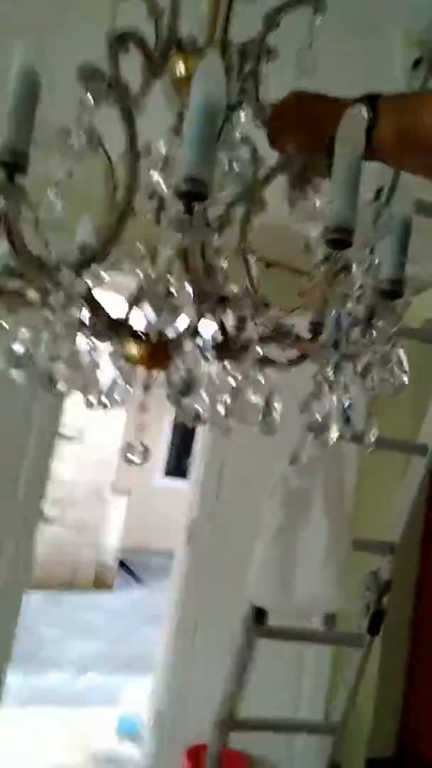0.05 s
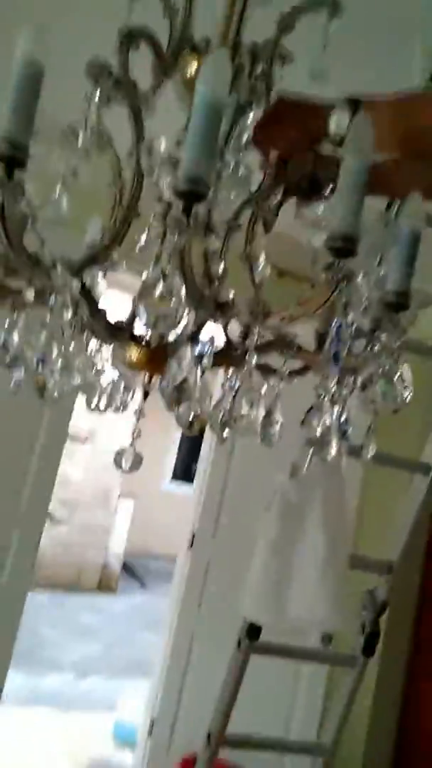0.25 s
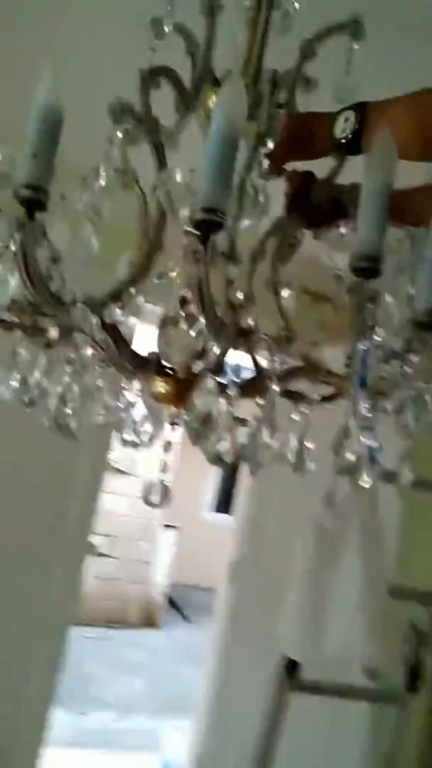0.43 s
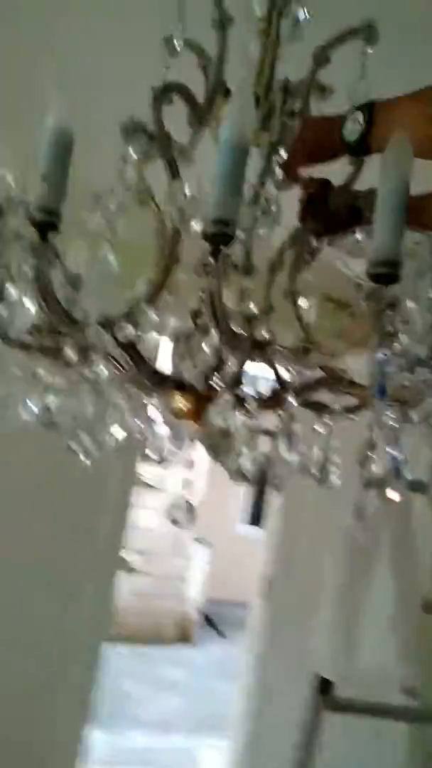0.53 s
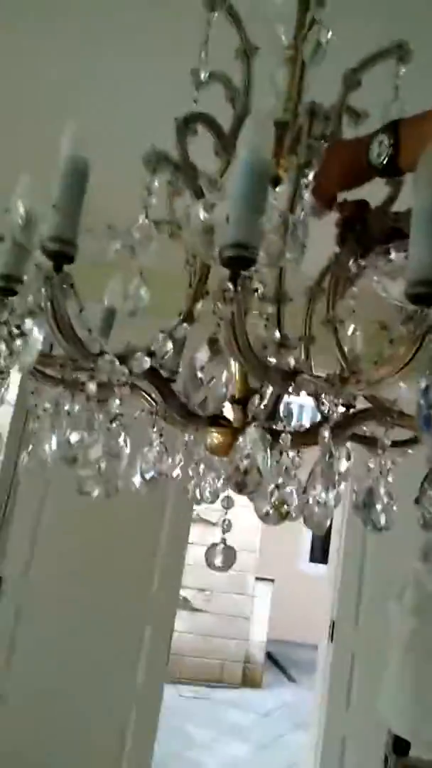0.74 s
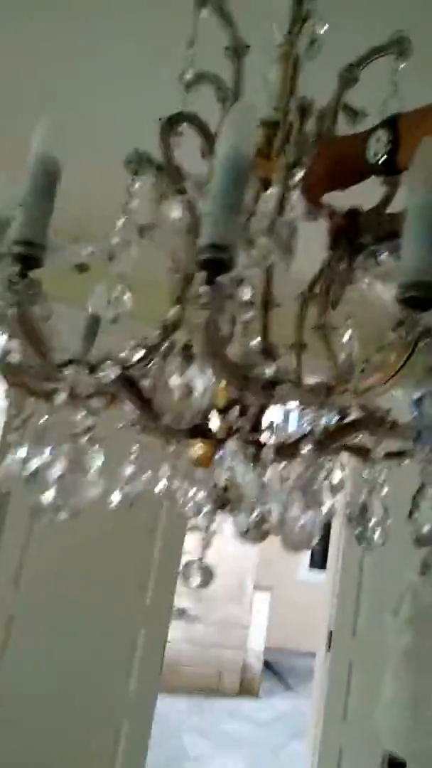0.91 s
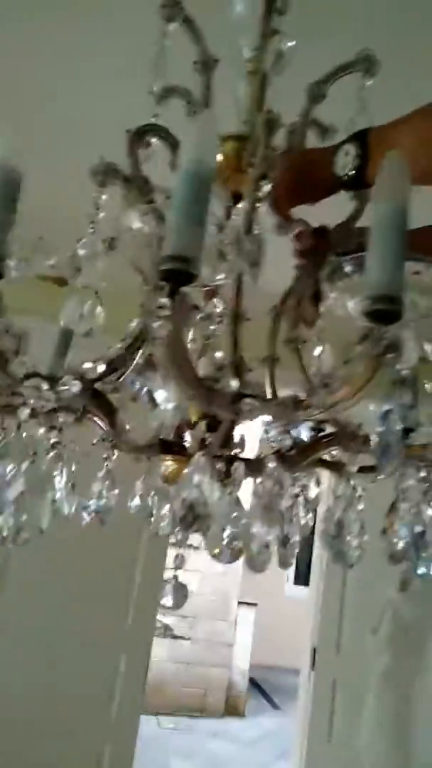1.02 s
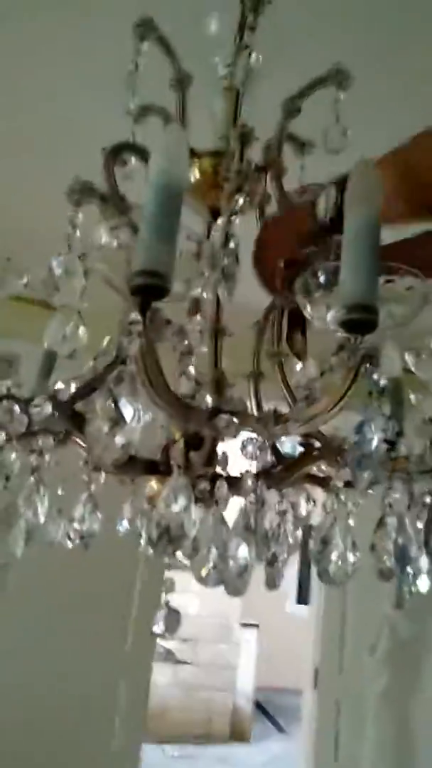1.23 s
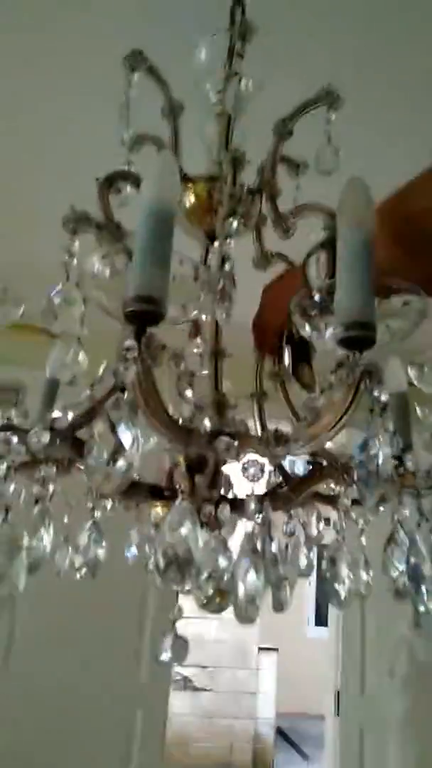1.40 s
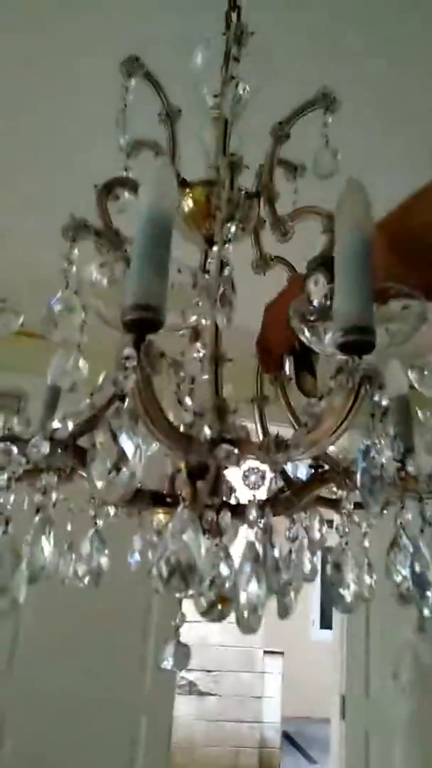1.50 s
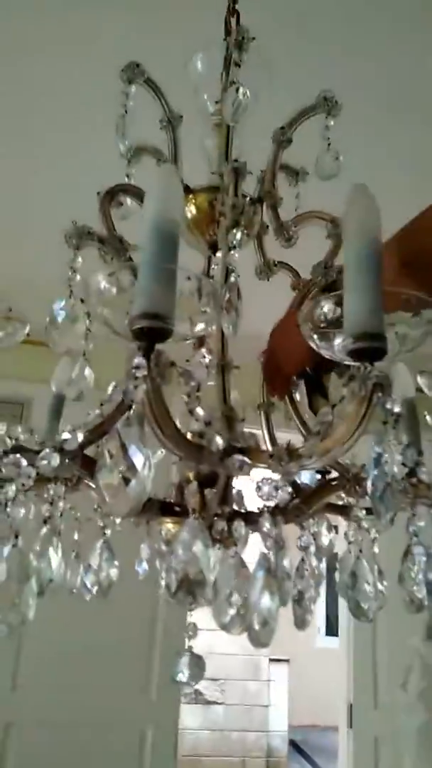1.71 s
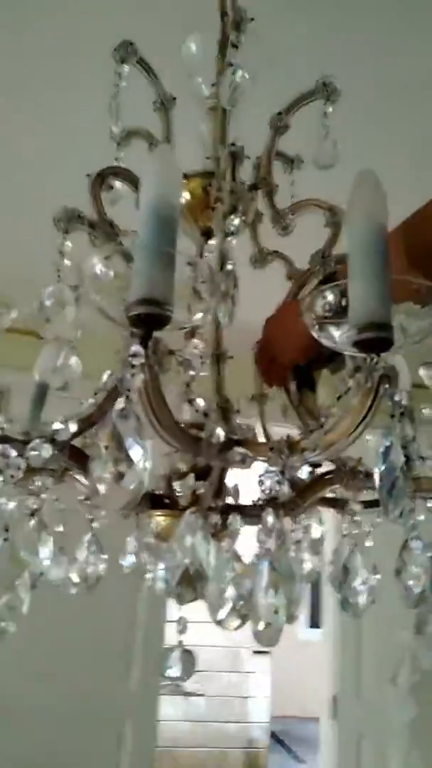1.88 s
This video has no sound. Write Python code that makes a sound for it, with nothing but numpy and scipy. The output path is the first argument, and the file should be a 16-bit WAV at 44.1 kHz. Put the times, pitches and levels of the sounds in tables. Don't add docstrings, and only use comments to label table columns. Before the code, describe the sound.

A hand-knocked chandelier jingles: sharp high glass clinks in a dense burst, then a few stray ones

```python
import sys
import numpy as np
from scipy import signal
from scipy.fft import rfft, irfft
from scipy.io import wavfile
from scipy.ndimage import uniform_filter1d, minimum_filter1d

SR = 44100
rng = np.random.default_rng(int(sys.argv[2]) if len(sys.argv) > 2 else 0)


def linear_from_db(decibels):
    return 10 ** (np.asarray(decibels, float) / 20)


def unload_audio(sound):
    columns = np.transpose(np.atleast_2d(sound))
    steps = np.round(np.clip(columns, -1, 1) * 32767)
    wavfile.write(sys.argv[1], SR, steps.astype(np.int16))


N = 85995
LEAD = 13230
ALIKE_UNDER_HZ = 715
SPREAD_DB = 3


def read(table, x, axis=1, log=False):
    rows = np.array(table, float)
    if log:
        return np.interp(np.log(x), np.log(rows[:, 0]), rows[:, axis])
    return np.interp(x, rows[:, 0], rows[:, axis])


def highpass(x, hz, order=3):
    return signal.sosfilt(signal.butter(order, hz, "high", fs=SR, output="sos"), x)


def onset(size, rise_s):
    return 1 - np.exp(-np.arange(size) / SR / rise_s)


def wander(step):
    return uniform_filter1d(np.repeat(rng.standard_normal(N // step + 1), step), step)[:N]


def ring(hz, db, t60, phase, size):
    pole = (2j * np.pi * hz - np.log(1000) / t60)[:, None, None] / SR
    fade = np.exp(pole * np.arange(0, size, 64)[:, None]) * np.exp(pole * np.arange(64))
    weight = linear_from_db(db)[..., None, :] * np.exp(1j * phase)
    return (weight @ fade.reshape(len(hz), size)).imag


def modes(shape, lo_hz, hi_hz, main_hz, main_db, t60, main_t60, count, size):
    f = lo_hz * (hi_hz / lo_hz) ** ((np.arange(count) + rng.random(count)) / count)
    db = read(shape, f, log=True) + 10 * np.log10(f / main_hz) + SPREAD_DB * rng.standard_normal(count)
    t60 = np.append(t60 * linear_from_db(2.5 * rng.standard_normal(count)), main_t60)
    f = np.append(f, main_hz)
    phase = 2 * np.pi * rng.random((2, count + 1))
    phase[1] = phase[0] + (phase[1] - np.pi) * np.clip(f / ALIKE_UNDER_HZ - .3, 0, 1)
    direct, echoed = np.append(db, main_db), np.append(db, main_db - 7)
    return ring(f, np.array([direct, echoed]), t60, phase, size)


# f/Hz, density level/dB per Hz
GLASS_COLOUR = [(1760, -72), (3000, -42), (3380, -44.5), (7650, -11), (8270, -11), (10900, -2), (13600, 0),
                (16300, -13.5)]


def glass_drop(main_hz):
    contact_s, burst_s = 0.00034, 0.0057
    glass = modes(GLASS_COLOUR, 4490, 16220, main_hz, main_db=7, t60=.006, main_t60=.012, count=90, size=640)
    glass = glass * onset(640, contact_s)
    taps = rng.random((9, 2))
    contacts = np.zeros(512)
    contacts[0] = 1
    when = np.clip(taps[:, 0] * burst_s * SR, 1, 500).astype(int)
    contacts[when] = (2 * taps[:, 1] - 1) * linear_from_db(-6.5 * taps[:, 0])
    glass = highpass(signal.fftconvolve(glass, contacts[None, None], axes=2), 1470)
    return glass / np.abs(glass).max()


# f/Hz, density level/dB per Hz
FRAME_COLOUR = [(400, -18.5), (920, 0), (1250, -8.5), (1700, 4.5), (2700, 6), (3500, -1.5), (4600, 4.5),
                (7500, -1)]


def frame_knock(db, frame_db, knock_hz):
    lo_hz = 333.8 * linear_from_db(-0.342 * max(db, -30))
    out = modes(FRAME_COLOUR, lo_hz, 7524, knock_hz, main_db=12, t60=.015, main_t60=.045, count=70, size=2048)
    return out * onset(2048, .003) * linear_from_db(frame_db + 2.5) / 4


def contact_tick():
    tick = np.pad(rng.standard_normal((2, 96)) * np.hanning(96), ((0, 0), (0, 160)))
    return linear_from_db(-15) * highpass(tick, 3470)


def clink(db, hz, frame_db, knock_hz):
    out = frame_knock(db, frame_db, knock_hz)
    glass = glass_drop(hz)
    out[..., :glass.shape[2]] += glass
    out[..., :256] += contact_tick()
    return out


# t/s, level/dB
RATTLE_LEVEL = [(0, -91.5), (.23, -68), (.26, -23), (.45, -11.5), (.6, -32), (.75, -38), (.9, -43),
                (1.0, -80)]


def rattle():
    luck = rng.random((60, 4))
    s = .2 + .8 * luck[:, 0]
    db = read(RATTLE_LEVEL, s) - 8 * luck[:, 1]
    return np.c_[s, db, 7000 + 8000 * luck[:, 2], -16 + 0 * s, 800 + 4000 * luck[:, 3]]


# t/s, peak level/dB, loudest glass mode f/Hz, frame re glass level/dB, loudest frame mode f/Hz
KNOCKS = [(0.1534, -18, 11060, -16.5, 2696), (0.2393, -13, 15400, -22.5, 3090),
          (0.2408, -3.5, 9860, -27, 5240), (0.252, -5, 12800, -26, 2006),
          (0.2654, -14.5, 13500, -14.5, 1920), (0.2784, -34, 8700, -61, 5340),
          (0.3006, -12.5, 14200, -18, 4650), (0.3201, -8, 13600, -18, 2590),
          (0.3705, -3.5, 13400, -14.5, 5280), (0.3824, -4.5, 9510, -16, 2160),
          (0.4388, -10.5, 12310, -12, 2836), (0.461, 1, 14660, -20.5, 2793), (0.4624, -4, 10500, -17, 1643),
          (0.4774, 0.5, 13990, -18, 2347), (0.5094, -3.5, 10800, -39, 2700),
          (0.5805, -6.5, 10750, -21.5, 2120), (0.8164, -19.5, 10000, -8.5, 1982),
          (0.849, -9.5, 13220, -21, 5260), (0.8614, -14, 9950, -17.5, 2780), (1.23, -21, 11110, -39, 5500),
          (1.2366, -28, 10960, -51, 1700), (1.2444, -28, 12900, -64, 4710), (1.3912, -6, 12370, -25, 5760),
          (1.3935, -13, 13000, -50, 5310), (1.4354, -35, 12330, -63.5, 4120),
          (1.4584, -26.5, 11860, -69.5, 4070)]
EARLIER_KNOCKS = [
    (-.28, -8.5, 10940, -29, 2300),
    (-.25, -17.5, 12790, -24.5, 2900),
    (-.22, -18, 13670, -15.5, 4400),
    (-.19, -23, 14500, -9, 4800),
    (-.15, -19.5, 9420, -17, 1900),
]
# t/s, direct sound level/dB
FACING = [(.153, -7.5), (.24, 0.5), (.253, 2), (.266, -18), (.3, 3), (.32, -9), (.37, -9), (.383, -3.5),
          (.44, -7), (.4605, 2), (.478, -0.5), (.51, -10), (.58, -2), (.85, -4.5), (1.23, -5.5),
          (1.391, -0.5), (1.4, -2.5), (1.46, -4)]


def crystals():
    out = np.zeros((2, 2, LEAD + N + 2048))
    for s, db, hz, frame_db, knock_hz in [*EARLIER_KNOCKS, *KNOCKS, *rattle()]:
        i = LEAD + int(s * SR)
        level = linear_from_db(db + np.array([read(FACING, s), 0]))
        out[:, :, i:i + 2048] += clink(db, hz, frame_db, knock_hz) * level[:, None, None]
    return highpass(out[:, :, :LEAD + N], 350, order=4)


# f/Hz, level/dB, t60/s
BOWL_MODES = [(868.8, -7.5, 0.11), (965, -13.5, 0.2), (1524, -8.5, 0.33), (1662, -6, 0.47), (2052, 2, 0.52),
              (2315, -12, 0.64), (2527, -13.5, 0.5), (2863, -12.5, 0.14), (4340, -3, 0.81),
              (4830, -8, 0.64), (5263, -8.5, 0.93), (7280, -7.5, 0.12), (10550, 0, .2), (10750, -2, 0.42)]


def bowls():
    rows = np.array(BOWL_MODES)
    out = np.zeros((2, LEAD + N + 16384))
    for s, db, hz, frame_db, knock_hz in KNOCKS:
        luck = rng.standard_normal((4, len(rows)))
        if db + frame_db > -30:
            i = LEAD + int(s * SR)
            f = rows[:, 0] * (1 + .004 * luck[3])
            sing = ring(f, rows[:, 1] + SPREAD_DB * luck[0], rows[:, 2], 2 * luck[1:3], size=16384)
            out[:, i:i + 16384] += sing * linear_from_db(-44 + db) * onset(16384, 0.0013)
    return out[:, :LEAD + N]


# f/Hz, t60/s, level/dB
REVERB = [(404, 1.8, 0), (1080, 1.67, 0), (2500, 1.49, -1.5), (5257, 1.413, -0.5), (10000, 0.91, 1.5),
          (16700, 1.3, -9)]


def room(near, x):
    first_echo_s, build_s, early_db, early_t60_s = 0.0019, 0.015, 21, 0.046
    size = 2 * SR
    t = np.arange(size) / SR
    f = np.arange(size // 2 + 1) * SR / size + 1
    noise = rfft(rng.standard_normal((2, size)))
    alike = np.clip(1.3 - f / ALIKE_UNDER_HZ, 0, 1)
    noise[1] = alike * noise[0] + np.sqrt(1 - alike ** 2) * noise[1]
    tail = 0
    for hz in 200 * 2 ** np.arange(0, 6.6, .5):
        band = irfft(noise * np.clip(1 - 2 * np.abs(np.log2(f / hz)), 0, 1), size)
        tail = tail + band * linear_from_db(read(REVERB, hz, axis=2, log=True) - 60 * t / read(REVERB, hz, log=True))
    tail = tail * (1 + linear_from_db(early_db - 60 * t / early_t60_s))
    tail = tail * (1 - np.exp(-np.maximum(t - first_echo_s, 0) / build_s))
    side = np.array([[.5], [-.5]])
    tail = tail * linear_from_db(2.5 - 2.5 * side) / np.sqrt(SR / 14)
    return near * linear_from_db(6 * side) + signal.fftconvolve(x, tail, axes=1)[:, :x.shape[1]]


def scene():
    return room(*(crystals() + bowls()))[:, LEAD:]


# t/s, peak level/dB, f/Hz
FINGER_BUMPS = [
    (0.31, -65, 45.1),
    (0.34, -75, 108),
    (.41, -75, 153),
    (0.461, -54, 59.6),
    (0.744, -86, 108),
    (0.783, -58, 55),
    (1.231, -61, 56),
    (1.388, -65.5, 112.5),
    (1.61, -56, 113.6),
    (1.646, -48.5, 98.6),
]
# t/s, peak level/dB, f/Hz, half length/s
FRAME_CREAKS = [
    (.87, -53.5, 614, 0.01),
    (.97, -60, 496, 0.023),
    (1.05, -67, 196, 0.042),
    (1.13, -65.5, 344, 0.021),
    (1.255, -67.5, 688, 0.015),
    (1.27, -72, 489, 0.033),
    (1.395, -56.5, 1455, 0.0048),
    (1.93, -81.5, 615, 0.019),
]


def bumps_and_creaks():
    t = np.arange(N) / SR
    wobble = 2.5 * wander(400)
    out = np.zeros(N)
    for s, db, hz, half in [(*row, 0.011) for row in FINGER_BUMPS] + FRAME_CREAKS:
        phase = 2 * np.pi * hz * (t - s) + wobble * (hz > 180)
        out += linear_from_db(db) * np.exp(-((t - s) / half) ** 2) * np.sin(phase)
    return out


# f/Hz, density level/dB per Hz
FLOOR_COLOUR = [(15, -52), (25, -27), (55, -7.5), (98, -5), (160, -6), (350, -14.5), (700, -23),
                (2000, -24.5), (7000, -41), (9500, -59), (16000, -91.5)]
# t/s, level/dB
FLOOR_LEVEL = [(0, 4.5), (.25, 3), (.4, 11.5), (1.0, 0), (1.15, 2), (1.27, 3), (1.45, 4), (1.72, 1),
               (1.8, -4), (1.95, -3)]


def floor():
    t = np.arange(N) / SR
    f = np.arange(N // 2 + 1) * SR / N + 1
    mid, side = irfft(rfft(rng.standard_normal((2, N))) * linear_from_db(read(FLOOR_COLOUR, f, log=True)), N)
    out = (mid + linear_from_db(-7) * side * np.array([[1], [-1]])) / mid.std()
    return out * linear_from_db(-75 + 1.5 * wander(2000) + read(FLOOR_LEVEL, t))


# t/s, below the split level/dB, above the split level/dB
SUPPRESSOR_GAIN = [(0, 7.5, 6), (1.0, 1.5, -6), (1.07, -4, -3.5), (1.17, -19, -27.5), (1.225, -20.5, -55.5),
                   (1.229, -9.5, 2), (1.24, -12.5, 9), (1.3, -15.5, 0.5), (1.387, -13.5, -4.5),
                   (1.39, 6, 12.5), (1.398, -15.5, 4.5), (1.46, -20.5, 8), (1.54, -28, -12.5),
                   (1.65, -30, -14.5), (1.78, -29, -20.5), (1.95, -40.5, -18)]
# t/s, level/dB
LOW_BAND_GAIN = [(0, 5), (.1, -10), (.245, 1.5), (.36, 3.5), (1.95, -7)]


def suppressor(dry):
    t = np.arange(N) / SR

    def under(hz, order=5):
        return signal.sosfiltfilt(signal.butter(order, hz, fs=SR, output="sos"), dry)

    slow, low, high = under(1380), under(9600, order=4), under(14000)
    middle = linear_from_db(read(SUPPRESSOR_GAIN, t))
    lazy = uniform_filter1d(minimum_filter1d(middle, size=4096), size=1024)
    top_db = read(SUPPRESSOR_GAIN, t, axis=2)
    air_db = top_db + .5 * np.minimum(top_db - 16, 0) * (t > 1.39)
    x = slow * lazy * linear_from_db(read(LOW_BAND_GAIN, t)) + (low - slow) * middle
    return x + (high - low) * linear_from_db(top_db) + (dry - high) * linear_from_db(air_db)


def limiter(x):
    hold = int(.002 * SR)
    gain = np.minimum(.97 / (np.abs(x) + 1e-9), 1)
    return x * uniform_filter1d(minimum_filter1d(gain, 2 * hold), hold)


def band_limit(x):
    return signal.sosfilt(signal.butter(12, 16480, fs=SR, output="sos"), x)


def record(dry):
    x = suppressor(dry) + floor() + bumps_and_creaks()
    x = signal.sosfilt(signal.ellip(12, .2, 80, 15800, fs=SR, output="sos"), x)
    return band_limit(limiter(x))


dry = scene()
out = record(dry)
unload_audio(out)
```